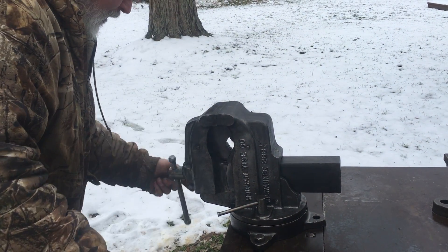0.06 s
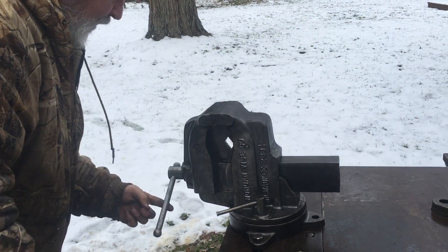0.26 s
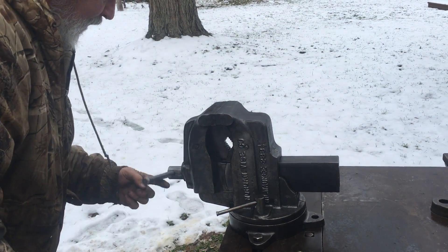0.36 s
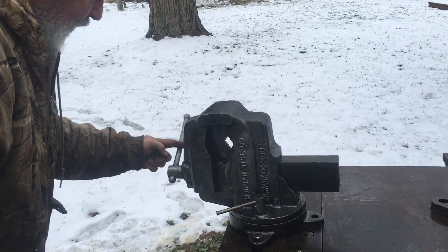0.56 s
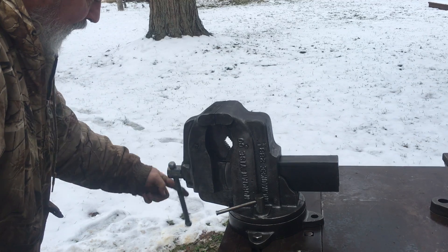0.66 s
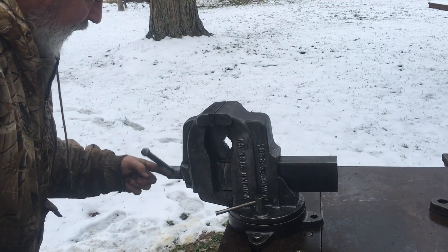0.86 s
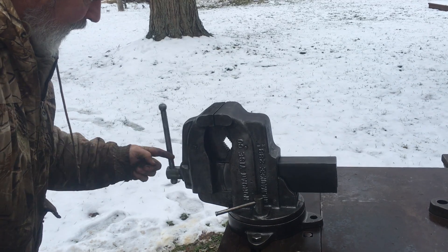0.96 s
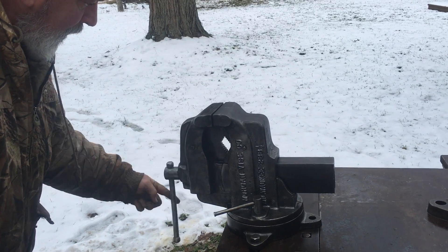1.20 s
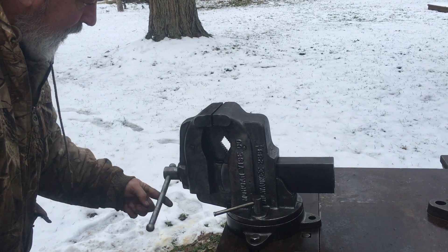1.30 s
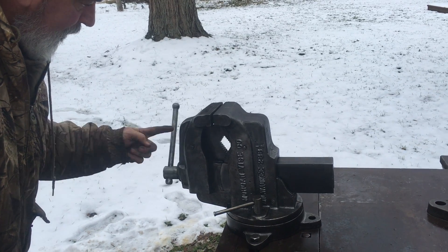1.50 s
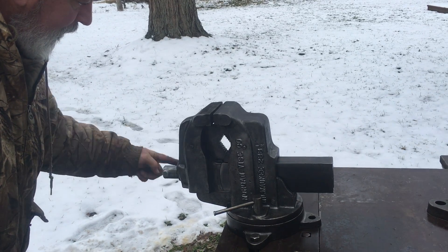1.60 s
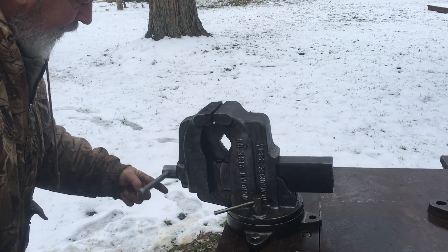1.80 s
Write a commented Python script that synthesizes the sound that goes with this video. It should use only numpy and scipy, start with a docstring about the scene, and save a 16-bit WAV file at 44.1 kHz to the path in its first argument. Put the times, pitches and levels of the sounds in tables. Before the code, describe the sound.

A steel vise handle drops with a ringing clank, then turns with quiet scrapes and knocks.

```python
"""Bench vise handle: drop and spin.

The steel handle bar of a vise slides through its spindle, lands with a ringing clank and bounces once.
A finger then spins the handle: the screw scrapes and knocks in its play, the bar ticks in its hole
and the jaw bumps. Underneath, a jacket sleeve swishes and the steel bench rumbles.
Outdoors in snow, so there is no echo."""
import sys
import numpy as np
from scipy import signal
from scipy.fft import irfft
from scipy.io import wavfile

SR = 44100
rng = np.random.default_rng(int(sys.argv[2]) if len(sys.argv) > 2 else 0)


def inscribe(sig):
    """Save sig as 16-bit PCM at rate SR to the path in sys.argv[1].

    A 1-D sig is mono; a 2-D sig holds one channel per row.
    Samples are clipped to [-1, 1] before scaling.
    """
    pcm = np.round(np.clip(np.atleast_2d(sig).T, -1, 1) * 32767)
    wavfile.write(sys.argv[1], SR, pcm.astype(np.int16))


N = 81585


def amp(db):
    """Decibels to gain."""
    return 10 ** (np.asarray(db) / 20)


def decay(t, t60):
    """Envelope that falls 60 dB in t60 seconds."""
    return np.exp(-np.log(1000) * t / t60)


def add(mix, start_s, sound):
    """Mixes a sound in at its start time."""
    part = mix[max(round(start_s * SR), 0):][:len(sound)]
    part += sound[:len(part)]


def noise(colour, size):
    """Noise of rms 1, shaped by an EQ curve."""
    hz, db = np.transpose(colour)
    freqs = np.fft.rfftfreq(size, 1 / SR)
    magnitude = amp(np.interp(np.log(freqs + 1), np.log(hz), db))
    wave = irfft(magnitude * np.exp(2j * np.pi * rng.random(len(freqs))), size)
    return wave / np.sqrt(np.mean(wave ** 2) + 1e-20)


def burst(colour, t60, attack_s):
    """Countless short modes struck together blur into a decaying noise hit."""
    t = np.arange(SR // 5) / SR
    return noise(colour, len(t)) * (1 - np.exp(-t / attack_s)) * decay(t, t60)


def ring(modes, attack_s):
    """A few clear modes set going by a soft push."""
    t = np.arange(round(SR * max(t60 for hz, db, t60 in modes))) / SR
    tones = sum(amp(db) * decay(t, t60) * np.sin(2 * np.pi * hz * t) for hz, db, t60 in modes)
    return (1 - np.exp(-t / attack_s)) * tones


def rub(fader, colour, grain_db, grain_hz):
    """Friction noise that follows a fader curve and catches unevenly."""
    t = np.arange(N) / SR
    grain = np.interp(t * grain_hz, np.arange(N), rng.standard_normal(N))
    level_db = np.interp(t, *np.transpose(fader)) + grain_db * grain
    return noise(colour, N) * amp(level_db)


# fader of the low rumble (time [s], level [dB])
RUMBLE_FADER = [(0, -56.5), (.17, -64.5), (.3, -48.5), (.55, -48), (.7, -49), (.85, -46), (.97, -60),
                (1.1, -49.5), (1.22, -56), (1.5, -55), (1.85, -56)]
# EQ of the rumble (frequency [Hz], gain [dB])
RUMBLE_EQ = [(20, -36.5), (36, -22), (50, -3.5), (58, -1.5), (70, 1), (82, -6.5), (100, -6.5), (135, -18.5),
             (250, -30.5), (800, -73)]
# swings of the bench top (time [s], level [dB])
SWAY_CUES = [(0.249, -35), (.802, -36.5), (1.461, -50.5), (1.625, -53)]
# deep modes of the bench top (frequency [Hz], gain [dB], t60 [s])
BENCH_MODES = [(51.24, -12, 2.3), (69, 5.5, 0.25), (87.65, -7, 0.19), (103, -11.5, .2), (194.04, -11, .3),
               (265, -13, .3), (296, -16.5, .5)]


def bench():
    """The steel bench rumbles under the work and swings after heavy loads."""
    out = rub(RUMBLE_FADER, RUMBLE_EQ, grain_db=-0.5, grain_hz=4.8)
    for start_s, db in SWAY_CUES:
        add(out, start_s, amp(db) * ring(BENCH_MODES, attack_s=0.006))
    return out


# fader of the cloth swish (time [s], level [dB])
SLEEVE_FADER = [(0, -56.5), (.04, -62), (.08, -88), (.4, -73.5), (.46, -67), (.53, -62), (.58, -67),
                (.63, -58.5), (.675, -51.5), (.715, -50), (.755, -58), (.79, -53), (.81, -84), (.93, -75),
                (1.46, -79), (1.51, -71), (1.55, -81), (1.8, -76), (1.85, -69.5)]
# broad, airy EQ of the cloth (frequency [Hz], gain [dB])
SLEEVE_EQ = [(300, -12.5), (900, -5), (1900, 0.5), (3000, -3), (5000, -2), (6800, -3), (9000, -4.5),
             (11500, -10.5), (15500, -11.5)]


def sleeve():
    """Jacket cloth swishes as the arm swings round."""
    return rub(SLEEVE_FADER, SLEEVE_EQ, grain_db=2.5, grain_hz=380)


# fader of the screw's scrape (time [s], level [dB])
SCRAPE_FADER = [(0, -53), (.11, -59), (.17, -52), (.3, -50.5), (.41, -58), (.54, -56), (.62, -59),
                (.83, -50.5), (.93, -62), (1.05, -65.5), (1.2, -61), (1.39, -62.5), (1.5, -63.5),
                (1.66, -63), (1.85, -64)]
# EQ of the scrape (frequency [Hz], gain [dB])
SCRAPE_EQ = [(60, -15.5), (150, -6.5), (230, -4.5), (284, 3), (335, -8), (400, -8.5), (560, -10),
             (800, -13), (975, -14.5), (1012, -0.5), (1060, -12.5), (1180, -15.5), (1600, -18.5),
             (2350, -22.5), (3500, -25), (4900, -32), (6000, -28.5), (10000, -36), (15500, -37)]
# knocks of the screw (time [s], level [dB])
KNOCK_CUES = [(0.7139, -22.5), (0.802, -32.5), (1.422, -34.5), (1.6075, -36)]
# modes of the screw (frequency [Hz], gain [dB], t60 [s])
SCREW_MODES = [(1015.6, -2.5, 0.1), (1064, -28.5, 0.58), (1276, -28, 0.1)]


def screw():
    """The turning screw scrapes and knocks in its play."""
    out = rub(SCRAPE_FADER, SCRAPE_EQ, grain_db=3, grain_hz=73.5)
    for start_s, db in KNOCK_CUES:
        add(out, start_s, amp(db) * ring(SCREW_MODES, attack_s=0.0048))
    return out


# dark EQ of a thud in the bench (frequency [Hz], gain [dB])
THUD_EQ = [(25, -42), (45, -18.5), (75, -5), (130, -5), (260, 5.5), (340, -7), (520, -1), (750, -11),
           (1050, -3.5), (1600, -20.5), (4000, -48.5)]


def thud(t60, attack_s):
    """The bench takes a hit and gives it low-end body."""
    return burst(THUD_EQ, t60, attack_s)


# bumps of the jaw (time [s], thud level [dB], ring frequency [Hz], ring level [dB])
BUMP_CUES = [(0.715, -46.5, 392, -53.5), (0.746, -40.5, 223, -38.5), (0.757, -53, 255, -38),
             (0.782, -42.5, 200, -41), (.808, -51.5, 275.5, -37), (1.416, -45, 228, -44),
             (1.586, -51.5, 486, -54), (1.606, -51.5, 336.6, -51.5)]


def jaw_bumps():
    """The sliding jaw bumps: a dull thud with one low ringing mode."""
    out = np.zeros(N)
    for start_s, thud_db, ring_hz, ring_db in BUMP_CUES:
        add(out, start_s, amp(thud_db) * thud(t60=0.14, attack_s=0.0021))
        add(out, start_s, ring([(ring_hz, ring_db, 0.15)], attack_s=0.0023))
    return out


# ticks (time [s], click level [dB], EQ pitch shift [ratio], ring frequency [Hz], ring level [dB])
TICK_CUES = [(0.06, -61, 1.5, 3080, -49.5), (0.1813, -31.5, 1.56, 3100, -48), (.296, -36.5, 1, 1870, -37.5),
             (0.319, -60, 0.73, 1870, -44.5), (0.372, -51, 1.04, 1850, -51), (.497, -66, 1.6, 2414, -52),
             (.529, -54.5, 1.24, 5709, -64), (.7948, -34, 1.034, 2430, -40),
             (0.7969, -33.5, 1.005, 2824, -35), (0.8245, -50, 1.1, 1820, -47),
             (.985, -61.5, 1.39, 2500, -76), (1.416, -57, 1.5, 3130, -53), (1.443, -48, 1.094, 3226, -49)]
# EQ of the click before its pitch shift (frequency [Hz], gain [dB])
TICK_EQ = [(600, -11.5), (1400, -12.5), (1850, 7.5), (2100, -1.5), (2400, 7.5), (2600, -18.5), (2900, -0.5),
           (3900, -10), (4800, -15), (6300, -9.5), (8000, -43.5), (15000, -59)]


def bar_ticks():
    """The bar taps lightly in its hole: a click with one short ringing mode."""
    out = np.zeros(N)
    for start_s, click_db, pitch, ring_hz, ring_db in TICK_CUES:
        shifted_eq = np.array(TICK_EQ) * [pitch, 1]
        add(out, start_s, amp(click_db) * burst(shifted_eq, t60=0.029, attack_s=0.0006))
        add(out, start_s, ring([(ring_hz, ring_db, 0.043)], attack_s=0.0006))
    return out


# bending modes of the bar, rubbed here and struck in bar_ring (frequency [Hz], gain [dB], t60 [s])
BAR_MODES = [(2225, -8, .14), (2285, -11, .12), (2363, -1, .14), (3037, 0, .13), (3520, -9, .1),
             (3598, 0, .12), (3758, -8, .11), (3888, -1, .12), (4232, -7, .12), (5709, -2, .27),
             (5908, 0, .18), (6650, -18, .09), (6812, -18, .09), (7740, -18, .16), (8925, -18, .12),
             (9325, -22, .08), (9561, 0, .22), (9758, -17, .18), (9808, -7, .18), (13888, -24, .6)]
# fader of the bar's faint singing (time [s], level [dB])
SLIDE_FADER = [(.04, -73), (.11, -71.5), (.17, -52), (.2, -37.5), (.28, -46), (.32, -52), (.36, -59),
               (.42, -63), (.48, -63), (.56, -70), (.7, -80.5), (1.85, -82.5)]
# how hard friction drives the modes (frequency [Hz], gain [dB])
SLIDE_DRIVE = [(2300, -0.5), (3000, -1), (3700, -6), (5700, 1), (5920, -2), (7500, -7.5), (9700, -5.5),
               (13900, 8)]


def bar_slide(width_hz=28):
    """The loose bar slides and trembles in its hole; friction makes each mode a narrow band of noise."""
    freqs = np.arange(500, SR // 2, 5)
    power = np.zeros(len(freqs))
    for hz, db, _ in BAR_MODES:
        drive_db = np.interp(hz, *np.transpose(SLIDE_DRIVE))
        peak = 1 / (1 + ((freqs - hz) / width_hz) ** 2)
        power += (amp(db + drive_db) * peak) ** 2
    colour = np.transpose([freqs, 10 * np.log10(power)])
    return rub(SLIDE_FADER, colour, grain_db=2, grain_hz=60)


# blows of the bar on the spindle, played by clank and bar_ring
# (time [s], ring level in each of five mode groups [dB], clatter level [dB], thud level [dB])
BLOW_CUES = [(0.183, -57.5, -49, -53, -54.5, -62.5, -47.5, -51.5),
             (0.19, -58, -36.5, -54.5, -55, -60, -53.5, -56.5),
             (0.1986, -58, -28.5, -54.5, -31.5, -58.5, -62.5, -52),
             (0.2069, -36.5, -15, -19.5, -16, -13.5, -15.5, -36.5),
             (0.2112, -34, -17.5, -22.5, -14.5, -10.5, -21.5, -42),
             (0.2166, -25.5, -15, -20.5, -14.5, -11.5, -24.5, -29),
             (0.2198, -18, -20, -32.5, -17.5, -13, -22, -29),
             (0.2532, -25.5, -28, -19.5, -28.5, -27.5, -26, -41.5),
             (0.2584, -23, -32, -25, -14, -36, -30, -47),
             (0.2653, -39.5, -28, -40.5, -12.5, -22, -41.5, -44.5)]
# EQ of the cast iron's dense, short ring (frequency [Hz], gain [dB])
CLATTER_EQ = [(700, -21), (1050, -9), (1700, -16.5), (2300, -3), (2750, -15), (3650, 3), (4300, -9),
              (4950, -14), (6000, -5), (6500, -13), (7600, -10.5), (8350, -18.5), (9900, -6.5),
              (10600, -23.5), (12000, -26.5), (14500, -24.5), (15800, -34)]


def clank(crack_boost_db=7.5):
    """Each blow cracks on contact, rattles the casting and thuds into the bench."""
    out = np.zeros(N)
    for start_s, *_, clatter_db, thud_db in BLOW_CUES:
        crack = burst(CLATTER_EQ, t60=0.009, attack_s=0.0003)
        clatter = burst(CLATTER_EQ, t60=0.092, attack_s=0.001)
        add(out, start_s, amp(clatter_db) * (amp(crack_boost_db) * crack + clatter))
        add(out, start_s, amp(thud_db) * thud(t60=0.2, attack_s=0.0017))
    return out


# centres of the bar's five mode groups (frequency [Hz])
GROUP_CENTRES = [2300, 3040, 3700, 5800, 9600]
# choke once the bar rests on its knob (frequency [Hz], start time [s], extra decay [dB/s])
CHOKE = [(3000, 0.251, 130), (6260, 0.26, 904.5), (10060, 0.3, 490), (13900, .34, 209)]


def bar_ring(contact_s=0.0007, jolt_rad=0.52):
    """Each blow resets the strength of the bar's bending modes and jolts their phase."""
    t = np.arange(N) / SR
    blows = np.array(BLOW_CUES)
    blow_s, group_db = blows[:, 0], blows[:, 1:6]
    latest = np.maximum(np.searchsorted(blow_s, t) - 1, 0)
    since_blow = np.maximum(t - blow_s[latest], 0)
    struck = t >= blow_s[0]
    choke_hz, choke_s, choke_rate = np.transpose(CHOKE)
    jolts = jolt_rad * rng.standard_normal((len(blows), len(BAR_MODES)))
    phases = np.cumsum(jolts, axis=0) + 2 * np.pi * rng.random(len(BAR_MODES))
    pole = np.exp(-1 / (contact_s * SR))  # a blow builds up over the contact time
    out = np.zeros(N)
    for mode, (hz, db, t60) in enumerate(BAR_MODES):
        force_db = np.array([np.interp(hz, GROUP_CENTRES, levels) for levels in group_db])
        since_choke = np.maximum(t - np.interp(hz, choke_hz, choke_s), 0)
        choke_db = np.interp(hz, choke_hz, choke_rate) * since_choke
        envelope = struck * amp(db + force_db[latest] - choke_db) * decay(since_blow, t60)
        swing = envelope * np.exp(1j * phases[latest, mode])
        softened = signal.lfilter([1 - pole], [1, -pole], swing)
        out += (softened * np.exp(2j * np.pi * hz * t)).real
    return out


def scene():
    """All layers in mono, close and dry."""
    drop = bar_ring() + clank() + bar_slide()
    mechanism = screw() + bar_ticks() + jaw_bumps()
    bed = bench() + sleeve()
    return (drop + mechanism + bed)[None]


def record(dry):
    """The microphone rounds off the highest peaks; a steep low-pass trims the top end."""
    rounded = dry / (1 + dry ** 4) ** (1 / 4)
    lowpass = signal.firwin(255, 15850, window=("kaiser", 9), fs=SR)
    return signal.oaconvolve(rounded, lowpass[None], "same")


dry = scene()
out = record(dry)
inscribe(out)
```